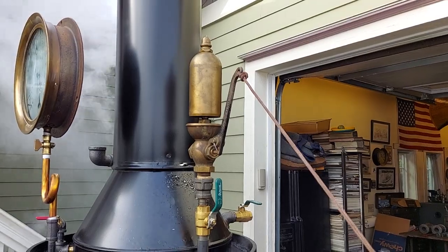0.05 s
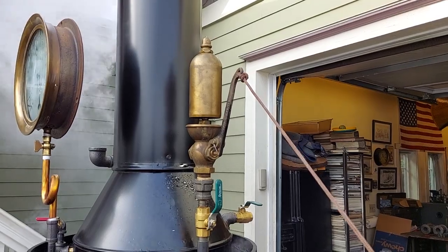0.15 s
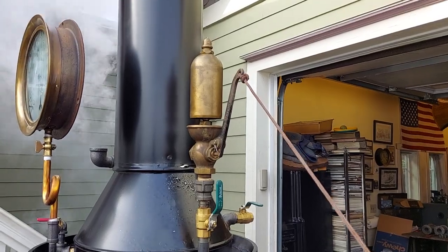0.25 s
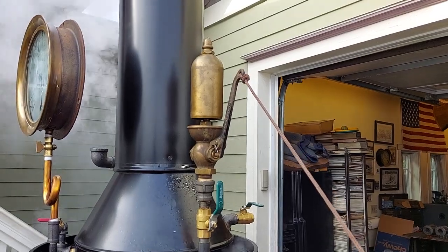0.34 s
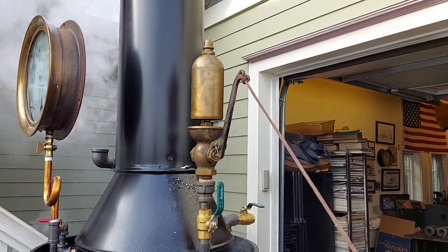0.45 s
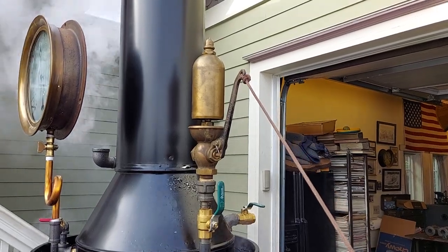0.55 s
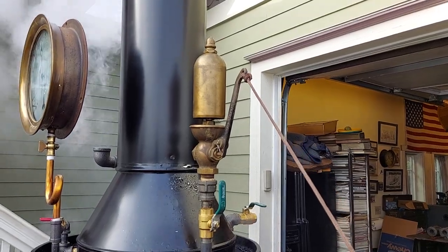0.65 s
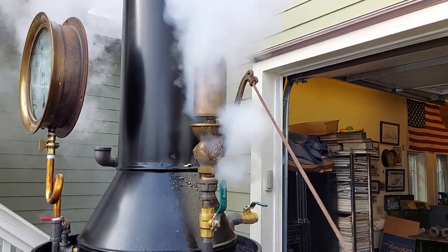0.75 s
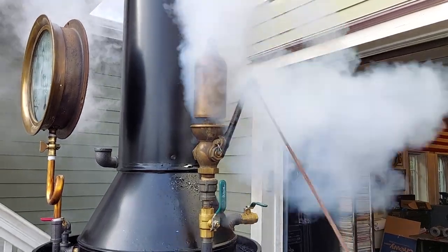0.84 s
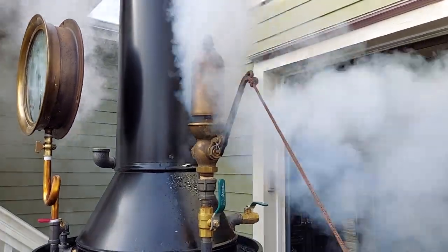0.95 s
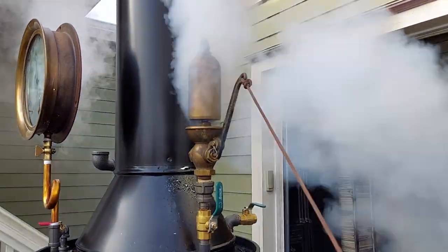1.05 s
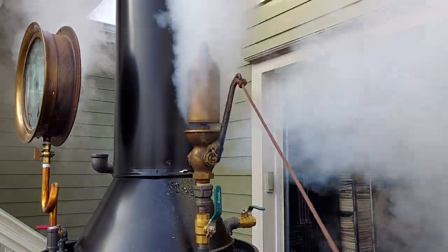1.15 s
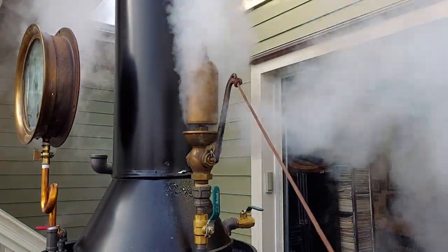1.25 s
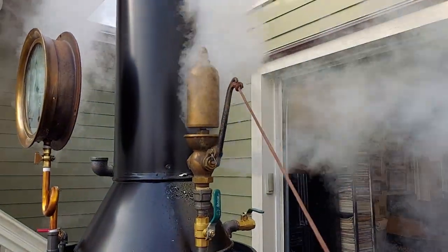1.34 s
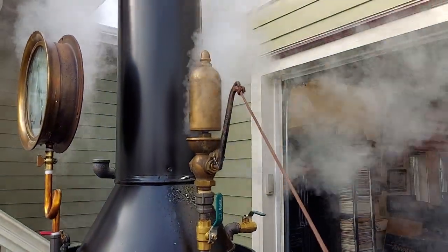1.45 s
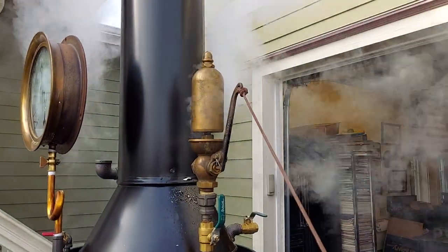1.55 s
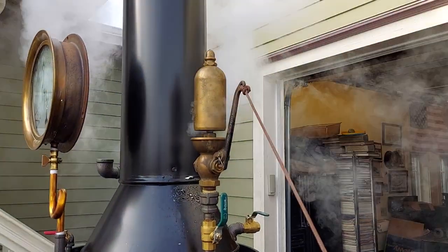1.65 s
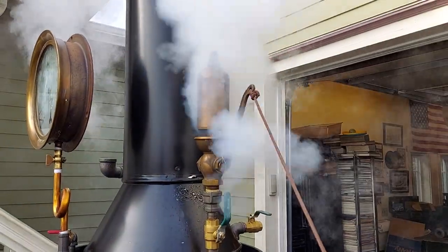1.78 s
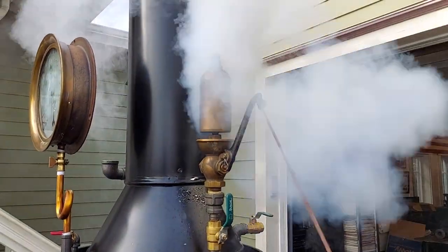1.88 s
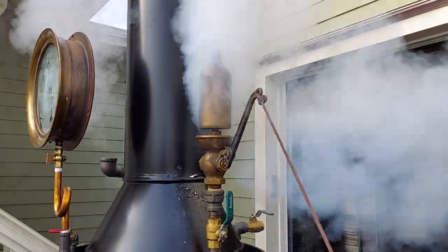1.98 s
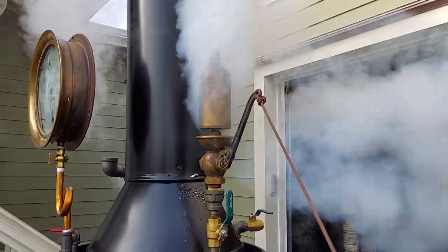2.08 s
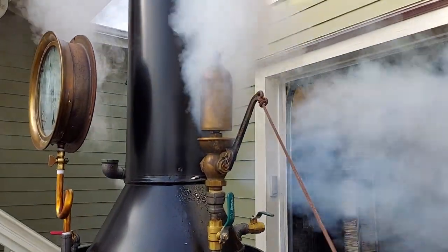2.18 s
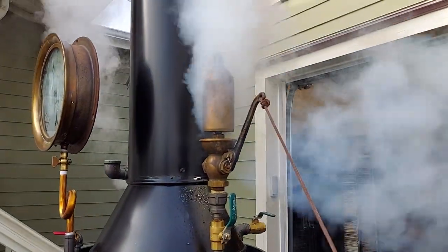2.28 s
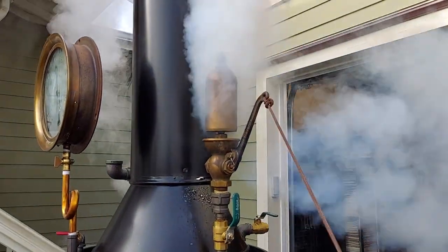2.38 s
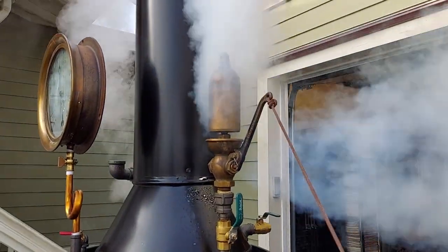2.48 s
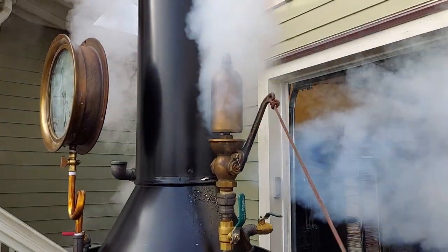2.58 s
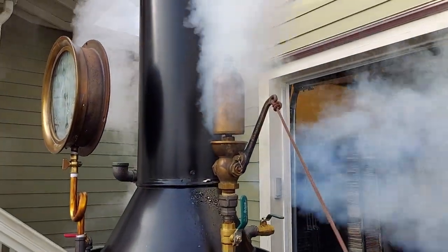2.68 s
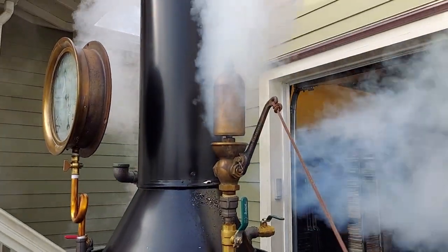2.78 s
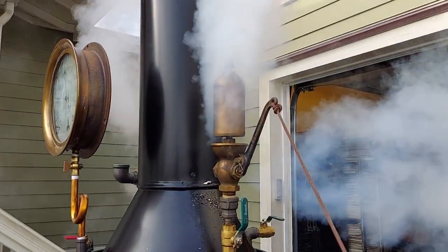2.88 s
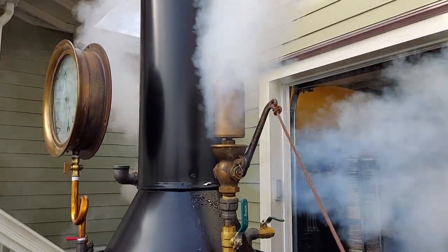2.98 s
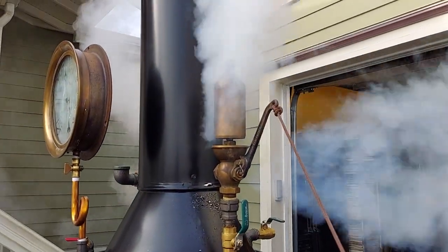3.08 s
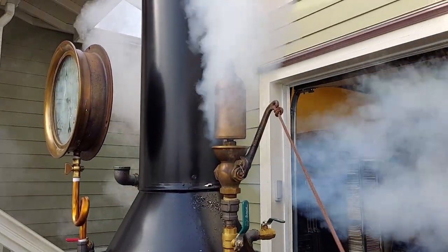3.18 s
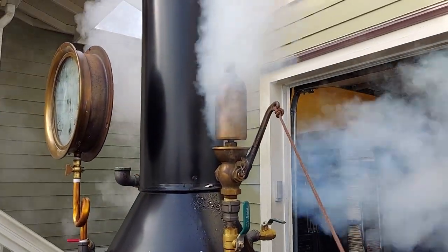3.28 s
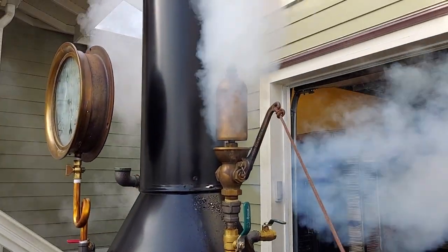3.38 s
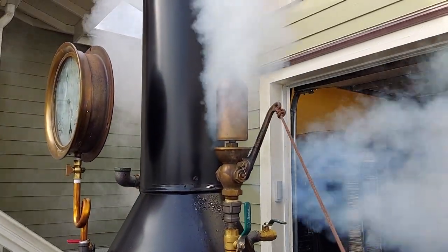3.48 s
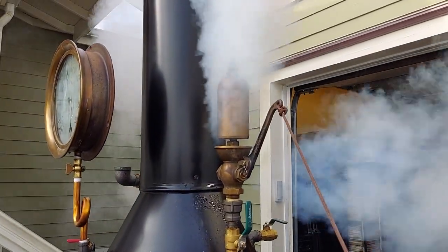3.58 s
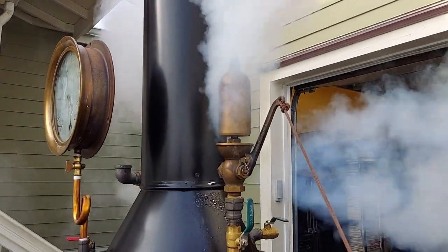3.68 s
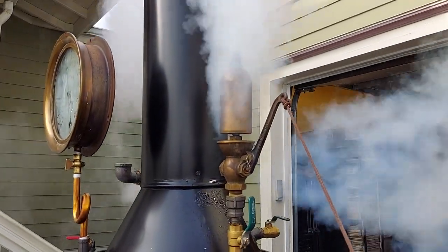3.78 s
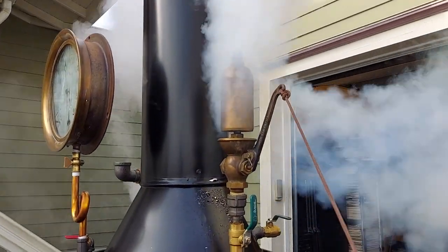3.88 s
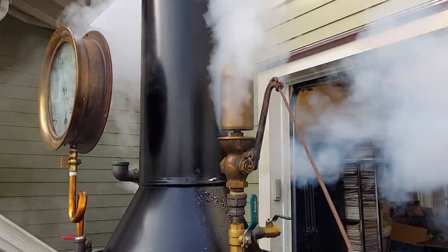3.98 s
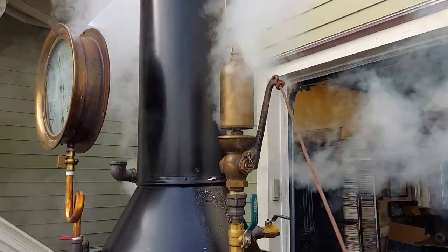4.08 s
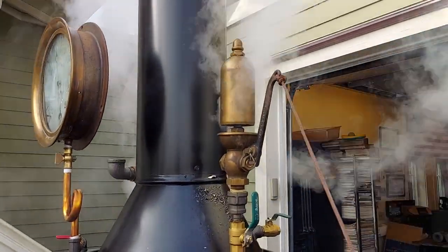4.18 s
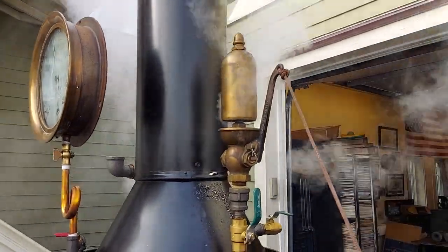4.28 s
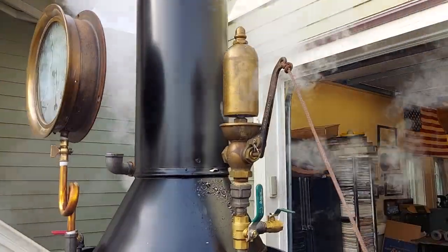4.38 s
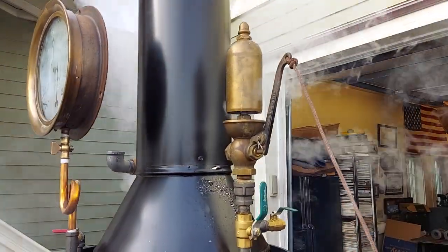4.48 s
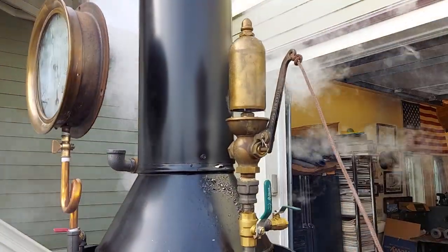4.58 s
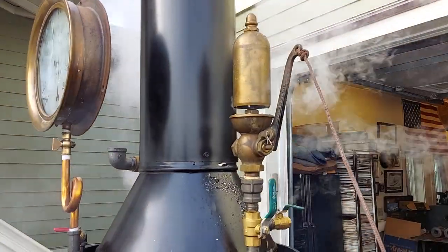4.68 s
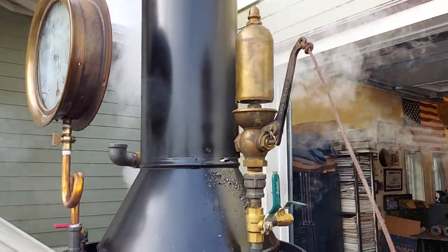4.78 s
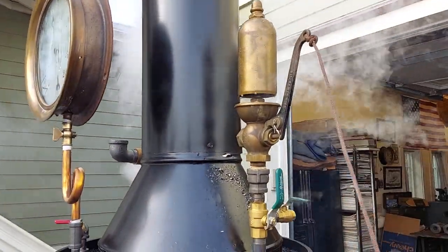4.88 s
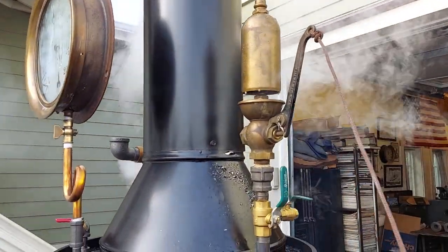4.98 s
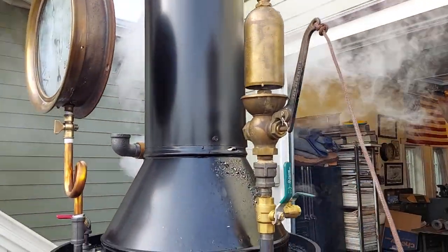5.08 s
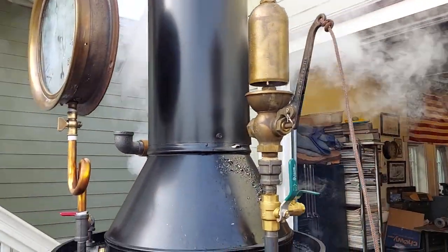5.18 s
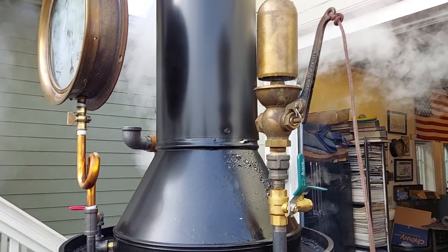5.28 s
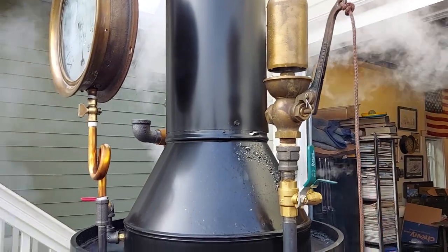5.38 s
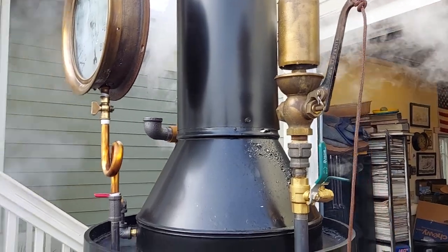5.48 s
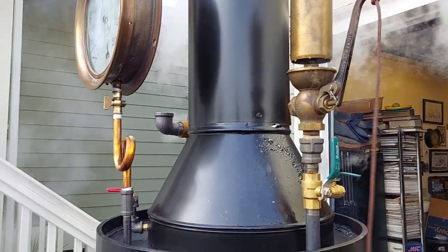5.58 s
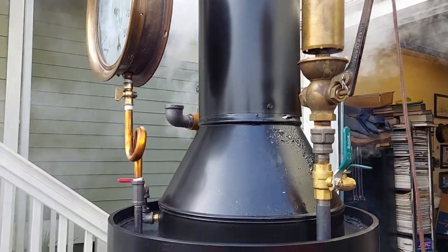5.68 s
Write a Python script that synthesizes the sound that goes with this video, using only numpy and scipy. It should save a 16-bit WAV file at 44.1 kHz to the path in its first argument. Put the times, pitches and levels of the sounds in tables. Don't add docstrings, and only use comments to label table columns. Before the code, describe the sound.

Steady steam hiss beside a boiler, then a brass steam whistle blows one short and one long shrill blast, echoing briefly outdoors.

```python
import sys
import numpy as np
from scipy import signal
from scipy.fft import rfft, irfft
from scipy.io import wavfile
from scipy.ndimage import uniform_filter1d

SR = 44100
rng = np.random.default_rng(int(sys.argv[2]) if len(sys.argv) > 2 else 0)


def natural_amplitude(level_db):
    exponent = np.asarray(level_db, float) / 20
    return 10 ** exponent


def inscribe(sig):
    pcm = np.round(np.clip(np.atleast_2d(sig).T, -1, 1) * 32767)
    wavfile.write(sys.argv[1], SR, pcm.astype(np.int16))


N = 253134
T = np.arange(N) / SR
FRAMES, BINS = np.arange(N // 128 + 5) * 128 / SR, np.fft.rfftfreq(512, 1 / SR)

# open_s, shut_s, pitch_hz, rise_s, closing_stretch (ratio)
BLASTS = [
    (0.755, 1.239, 755.2, 0.024, 0.86),
    (1.789, 4.009, 760.9, 0.028, 0.96),
]
# time_s, note_db, third_partial_db (overblowing), steam_flow_db
HOLDS = [
    [(.784, -8, -43, -30), (.8, -13, -30.5, -30), (.892, -10, -24.5, -30), (1.176, -14, -24, -33),
     (1.238, -11, -33.5, -34.5)],
    [(1.81, -9.5, -18, -22.5), (1.84, -13.5, -31, -33.5), (1.91, -17.5, -22, -31.5),
     (2.14, -19, -23, -30.5), (2.45, -15.5, -19, -29.5), (2.72, -14.5, -20, -30), (3.25, -15, -22.5, -31.5),
     (3.55, -15.5, -28, -30.5), (4.005, -13.5, -27, -30)],
]
# time_s, half_length_s, pitch_hz, note_db, third_partial_db
SURGES = [(2.569, 0.023, -4, 3, -9), (2.697, 0.048, -2.5, 2, -6.5), (2.826, 0.043, -2.5, -3, 0),
          (2.87, 0.015, 6, 0, -4), (3.037, .04, -0.44, -2.5, 1.5), (3.127, 0.046, 5.2, 2.5, -3),
          (3.612, 0.059, 3, 2.5, 6), (3.736, 0.026, -3.5, -1.5, 0), (3.785, 0.028, 8, -0.3, 3),
          (3.896, 0.03, 3.2, 1.2, 9.5), (3.933, 0.013, 1.5, 0, -8)]
# after_shut_s, pitch_sag_hz, note_db, third_partial_db
CLOSING = [(0, 0, 1, 1), (.02, -43, -8, -3.5), (.045, -35.5, -6, -22), (.065, -57, -21.5, -30),
           (.08, -68, -25, -30)]
# multiple (ratio), level_db, pan_db, phase_lead_rad
UPPER_PARTIALS = [(4, -5, 17, -2.5), (5, -1, 11.5, -3.5), (6, -8, 31, 1.5), (7, -42, -8, 1)]
# time_s, first_pan_db, first_lead_rad, second_pan_db, third_lead_rad
BEARING = [(.76, 2.1, .74, 2, 1), (.9, -4.5, -.14, 6, 1), (1.3, -6, -0.51, -1.1, 0),
           (1.8, -3, 0.093, .2, 1), (2.01, -6, 0.81, 12, -1.1), (2.6, -5, 0.91, 12, -1.8),
           (2.8, -3.5, 0.99, 0.5, -2.1), (4.0, -1, 0.55, 6, -2)]
# pitch_hz, level_db (per Hz)
JET_SPECTRUM = [(530, -23), (900, -10), (1410, -10.5), (1530, -10.5), (1920, -11.5), (2120, -7.5),
                (2220, -7.5), (2330, -14.5), (2540, -13.5), (5220, -15.5), (6410, -20), (9200, -19.5),
                (10500, -21.5), (14200, -23), (16000, -28)]
# pitch_hz, likeness (0-1)
JET_SAME = [(900, 0.79), (2000, 0.34), (4000, 0.41), (8000, 0.35), (12000, 0.3), (16000, 0.089)]
# pitch_hz, pan_db
JET_PAN = [(60, 15), (130, 11), (290, 14), (640, 33), (1410, 3), (3100, 7), (6820, 2.5), (15000, -8)]
# pitch_hz, level_db (per Hz)
BUFFET_SPECTRUM = [(20, -14), (45, 0), (90, 2), (160, -1.5), (370, -2), (640, -2.5), (1200, -11),
                   (3000, -22.5), (6000, -26)]
# peak_s, hiss_db, gasp_db (breath), jet_dies_s
SPITS = [
    (0.766, -18, -8, 1.2344),
    (1.802, -34.5, -3, 3.992),
]
# start_s, end_s, level_db, pitch_hz, width_hz
CHUFFS = [
    (0.757, 0.776, -22.5, 4480, 1200),
    (1.793, 1.816, -38, 4993, 1200),
]
# start_s, end_s, level_db, pitch_hz, width_hz
LAST_GUST = (3.96, 4.055, -36, 75, 80)
# pitch_hz, width_hz, level_db
LEAK_PIPES = [(810, 260, -10), (2123, 65, -1), (2430, 57, 0), (3160, 19, -7), (3560, 17, -4),
              (3690, 73, -3), (5790, 72, -11), (7540, 450, -11), (11500, 74, -19), (13500, 420, -15)]
# time_s, level_db, turned (0-1)
LEAK_COURSE = [(0, -21.5, 0.46), (.25, -23, 0.37), (.5, -22.5, 0.33), (.75, -23.5, 0.45),
               (1.4, -24.5, 0.63), (1.7, -18, 0.56), (4.2, -25, 0.9), (5.2, -22.5, 1), (5.74, -20.5, 1)]
# pitch_hz, likeness (0-1)
LEAK_SAME = [(60, 0.21), (170, 1), (400, 0.89), (700, 1), (1100, 0.39), (2200, 0.99), (3000, 0.33),
             (6000, 0.087), (12000, 0.19)]
# pitch_hz, pan_db
LEAK_PAN = [(60, 29.5), (130, -2), (290, 5), (640, 1), (1410, 5.5), (3100, 7), (6820, -1), (15000, -6)]
# pitch_hz, level_db
LEAK_NEAR = [(15, -60), (25, -23), (64, -12), (293, -31), (516, -0.5), (624, -28), (818, -8), (1400, -13),
             (2160, 2.5), (2910, -6), (3720, -5.5), (4370, -13), (7510, -10.5), (10700, -19.5),
             (16000, -20)]
# pitch_hz, level_db
LEAK_TURNED = [(25, -24), (70, -17), (240, -27), (430, -28.5), (620, -27), (950, -24), (1480, -27),
               (2050, -18), (2840, -23.5), (3720, -18.5), (4370, -20.5), (7510, -20.5), (10400, -24),
               (16000, -28.5)]
# peak_s, peak_db, pitch_hz, t60_s, pan_db
TICKS = [
    (5.526, -28, 5500, 0.018, 2),
    (5.5295, -18, 5350, 0.016, 2),
    (5.534, -28, 5450, 0.04, 2),
]
# left_delay_s, right_delay_s, level_db
CLOSE_SURFACES = [(.0011, 0.00093, -21.5), (.0027, 0.0021, -20.5), (.0046, 0.0041, -13),
                  (.0083, 0.0068, -12), (.0131, 0.01, -17.5), (0.0202, 0.018, -11)]
# delay_s, level_db, pan_db
WALLS = [(.07, -25.5, 4.5), (.131, -18.5, 4), (.186, -34, 7.5), (.283, -39, 4)]
# delay_s, level_db
FAR_HOUSES = [(.45, -88), (.62, -66.5), (.78, -52), (.87, -41)]
# multiple (ratio), level_db, width_hz
DRONE_PARTIALS = [(1, -43.5, 4.8), (2, -24.5, 0.65), (4, -39.5, 8.63), (5, -49.5, 7.8)]
# time_s, level_db
DRONE_SWELL = [(0, -66), (2.6, -22), (3.6, -4), (5.74, 3)]
# time_s, gain_db
GAIN = [(0, 0), (.768, 1), (.79, -19), (.9, -18), (1.8, -26.5), (2.1, -22.5), (5.08, -22), (5.74, -13)]
# pitch_hz, level_db
MIC = [(20, -40), (50, 0), (5500, 0), (6400, -6), (7300, -2.5), (9900, 0.5), (10400, -8), (11400, -4.5),
       (13000, -3.5), (14200, 2.5), (15700, 4.5)]

SCOOP_HZ, SCOOP_S, RISE_DB = 63, .025, 39
DRY_S, DRYING_S, DRY_SAG_HZ = 2.67, .09, 12
WARMING_S = 1.3
SECOND_DB, SECOND_WARM_DB, SECOND_DRY_DB, SECOND_DB_PER_HZ = -39, 10, -7, 1.15
THIRD_PAN_DB, THIRD_PAN_DRY_DB = 4, 2
UPPER_DB, UPPER_WARM_DB, WEAK_RISE_S = -49.5, 17, 0.012
SPIT_DB_PER_S, GASP_LATE_S, GASP_DB_PER_S, GASP_RISE_S = 1498, 0.008, 300, 0.0048
JET_RISE_S, JET_FALL_DB_PER_S = 0.041, 694
LINGER_DB, LINGER_FALL = -16.5, 0.13
HISS_DRY_DB, BUFFET_DB, BUFFET_DRY_DB, BUFFET_FALL = -2, 4.5, -5, 1.2
BREATH_DB, BREATH_DRY_DB, DAMP_AGAIN_S = 16, -45, 3.72
DRONE_HZ = 244.95


def whistle():
    out, thrown = np.zeros((2, N)), np.zeros(N)
    shake_hz, tremble_db, tremble3_db = 1.2 * wander(60), .5 * wander(90), 1.1 * wander(90)
    pan_db, lead, pan2_db, lead3 = curves(BEARING, T)
    dry, lift_hz = dryness(), surge(column=2)
    blown_s = sum((shut - opens) * ramp(opens, shut - opens) for opens, shut, *_ in BLASTS)
    warm = np.minimum(blown_s / WARMING_S, 1)
    for (opens, shut, top_hz, rise, stretch), rows in zip(BLASTS, HOLDS):
        sag_hz, close_db, close3_db = curves(CLOSING, (T - shut) / stretch)
        scoop_hz = SCOOP_HZ * np.exp(-np.maximum(T - opens, 0) / SCOOP_S)
        hz = top_hz - DRY_SAG_HZ * dry + lift_hz + sag_hz - scoop_hz
        phase = 2 * np.pi * np.cumsum(hz + shake_hz) / SR
        carry = natural_amplitude(-.7 * np.maximum(746 - hz, 0))
        on = ramp(opens, 0.0072) - ramp(shut + stretch * CLOSING[-1][0] - .006, .006)
        weak = ramp(opens + rise, WEAK_RISE_S) - ramp(shut, WEAK_RISE_S)

        first_db, third_db, _ = curves(rows, T) - RISE_DB * (1 - ramp(opens, rise)) ** 2
        first_db = first_db + surge(column=3) + close_db + tremble_db
        third_db = third_db + surge(column=4) + close3_db + tremble3_db
        second_db = SECOND_DB + SECOND_WARM_DB * warm
        second_db = second_db + dry * (SECOND_DRY_DB + SECOND_DB_PER_HZ * lift_hz)
        first = natural_amplitude(first_db) * ports(phase, pan_db, lead)
        second = weak * carry * natural_amplitude(second_db + wander(80)) * ports(2 * phase, pan2_db, 1.0)
        third = natural_amplitude(third_db) * ports(3 * phase, THIRD_PAN_DB + THIRD_PAN_DRY_DB * dry, lead3)
        out += on * (first + second + third)
        thrown += on * carry * (first + natural_amplitude(-11.0) * second + natural_amplitude(1.5) * third).mean(0)

        for multiple, db, upper_pan_db, upper_lead in UPPER_PARTIALS:
            upper_db = UPPER_DB + UPPER_WARM_DB * warm + db + wander(85.1)
            upper = weak * natural_amplitude(upper_db) * ports(multiple * phase, upper_pan_db, upper_lead)
            out += upper
            thrown += natural_amplitude(-6) * carry * upper.mean(0)
    return out, thrown


def dryness():
    return ramp(DRY_S - DRYING_S / 2, DRYING_S)


def surge(column):
    return sum(row[column] * np.exp(-((T - row[0]) / row[1]) ** 2) for row in SURGES)


def jet():
    hissing, buffeting, breathing = flows()
    sheet = hiss(read(JET_SPECTRUM, BINS)[:, None], JET_SAME, JET_PAN, 0.00021,
                 patchy_db=1.0, flicker_db=0.95)
    buffet = hiss(read(BUFFET_SPECTRUM, BINS)[:, None], [(20, .1), (900, 0.15)],
                  [(20, 15), (300, 17.8), (900, 24.0)], 1e-4, patchy_db=0.5, flicker_db=1.0)
    breath = breathing * natural_amplitude(-13) * evened(resonate(sheet, 2210, 286))
    breath += breathing * natural_amplitude(-16.5) * evened(resonate(sheet + buffet, 731, 155))
    breath += sum(puff(sheet, *row) for row in CHUFFS)
    steam = hissing * natural_amplitude(3.0) * sheet + breath
    return steam, buffeting * natural_amplitude(2.5) * buffet + puff(buffet, *LAST_GUST)


def flows():
    dry = dryness()
    hissing, buffeting, breathing = strengths = np.zeros((3, N))
    clear = dry - 0.92 * ramp(DAMP_AGAIN_S, 0.12)
    for (opens, *_), rows, (spit_s, spit_db, gasp_db, dies) in zip(BLASTS, HOLDS, SPITS):
        flow = ramp(opens, JET_RISE_S) ** 2 * natural_amplitude(curves(rows, T)[2])
        fall_db = JET_FALL_DB_PER_S * np.maximum(T - dies, 0)
        lasting = natural_amplitude(-fall_db) + natural_amplitude(LINGER_DB - LINGER_FALL * fall_db)
        hissing += flow * natural_amplitude(HISS_DRY_DB * dry) * lasting
        hissing += natural_amplitude(spit_db - SPIT_DB_PER_S * abs(T - spit_s))
        buffeting += flow * natural_amplitude(BUFFET_DB + BUFFET_DRY_DB * dry - BUFFET_FALL * fall_db)
        breathing += flow * natural_amplitude(BREATH_DB + BREATH_DRY_DB * clear - fall_db)
        gasp = natural_amplitude(gasp_db - GASP_DB_PER_S * abs(T - spit_s - GASP_LATE_S))
        breathing += ramp(spit_s, GASP_RISE_S) ** 2 * gasp
    return strengths


def puff(x, start, end, db, hz, width):
    swell = np.sin(np.pi * np.clip((T - start) / (end - start), 0, 1))
    return natural_amplitude(db) * swell * evened(resonate(x, hz, width))


def leak():
    level_db, _ = curves(LEAK_COURSE, T)
    turned = np.clip(curves(LEAK_COURSE, FRAMES)[1], 0, 1)
    humps_db = sum(5.54 / (1 + (2 * (BINS - hz) / (width + 150)) ** 2) for hz, width, _ in LEAK_PIPES)
    field_db = np.outer(read(LEAK_NEAR, BINS), 1 - turned) + np.outer(read(LEAK_TURNED, BINS), turned)
    field_db += humps_db[:, None]
    field_db -= 10 * np.log10(np.mean(natural_amplitude(2 * field_db), axis=0))
    return natural_amplitude(level_db) * hiss(field_db, LEAK_SAME, LEAK_PAN, 1.1e-4, patchy_db=.4, flicker_db=.4)


def tick():
    out = np.zeros((2, N))
    for s, db, hz, t60, pan_db in TICKS:
        u = np.maximum(T - s, 0)
        envelope = natural_amplitude(db - 60 * u / t60) * np.minimum(u / .001, 1)
        out += envelope * ports(2 * np.pi * hz * u, pan_db, 1.6) / np.sqrt(2)
    return out


def close(x):
    taps = np.zeros((2, 1200))
    taps[:, 0] = 1
    for left_s, right_s, db in CLOSE_SURFACES:
        taps[[0, 1], [round(left_s * SR), round(right_s * SR)]] += natural_amplitude(db)
    return signal.oaconvolve(x, taps / np.linalg.norm(taps[0]), axes=1)[:, :N]


def yard(x):
    taps = np.zeros((2, SR))
    at = np.arange(400, SR - 20, 20) + rng.integers(0, 20, (2, (SR - 401) // 20))
    np.put_along_axis(taps, at, rng.choice([-1., 1.], at.shape), 1)
    taps *= natural_amplitude(-46 - 60 * T[:SR] / .5)
    for s, db, pan_db in WALLS:
        taps[:, round(s * SR)] += natural_amplitude(np.array([db + pan_db, db - pan_db]))
    for s, db in FAR_HOUSES:
        taps[:, round(s * SR)] += natural_amplitude(db)
    return signal.fftconvolve(x[None], taps, axes=1)[:, :N]


def drone():
    tones = np.zeros((2, N))
    for multiple, db, width in DRONE_PARTIALS:
        strength = natural_amplitude(db + 0.25 * width * wander(30))
        turns = np.cumsum(DRONE_HZ + 0.58 * width * wander(17.2)) / SR
        tones += strength * ports(multiple * 2 * np.pi * turns, 2.2, -0.21)
    return natural_amplitude(curves(DRONE_SWELL, T)[0]) * tones


def hiss(field_db, same, pan, lag_s, patchy_db, flicker_db):
    a, b, c, d, patches = rng.standard_normal((len(FRAMES), len(BINS), 5)).T
    patches = evened(uniform_filter1d(uniform_filter1d(patches, size=6, axis=0), size=16, axis=1))
    flicker = evened(uniform_filter1d(a[0], size=4))
    same = np.clip(read(same, BINS), 0, 1)[:, None]
    side = natural_amplitude(read(pan, BINS) / 2)[:, None]
    turn = np.exp(-2j * np.pi * BINS * lag_s)[:, None]
    right = a + 1j * b
    left = side * turn * (same * right + np.sqrt(1 - same ** 2) * (c + 1j * d))
    middle = np.sqrt(side ** 2 + side ** -2 + 2 * same * turn.real)
    strength = natural_amplitude(field_db + patchy_db * patches + flicker_db * flicker)
    z = np.array([left, right / side]) / middle * strength
    x = signal.istft(z, nperseg=512, noverlap=384)[1][:, :N]
    return x / np.std(x.mean(0))


def ports(phase, pan_db, lead):
    left, right = natural_amplitude(pan_db / 2) * np.exp(1j * lead), natural_amplitude(-pan_db / 2)
    wave = np.exp(1j * phase) * np.sqrt(8) / np.maximum(abs(left + right), .7)
    return np.array([(left * wave).real, (right * wave).real])


def resonate(x, hz, width):
    turn = np.exp(2j * np.pi * np.cumsum(hz * np.ones(N)) / SR)
    r = np.exp(-np.pi * width / SR)
    smooth = signal.lfilter([1], [1, -r], signal.lfilter([1], [1, -r], x / turn))
    return (turn * smooth).real


def wander(hz):
    lowpass = signal.butter(2, hz, fs=SR, output="sos")
    return evened(signal.sosfilt(lowpass, rng.standard_normal(N)))


def evened(x):
    return x / np.sqrt(np.mean(abs(x) ** 2) + 1e-20)


def ramp(start, length):
    return np.clip((T - start) / length, 0, 1)


def read(points, hz):
    f, value = np.transpose(points)
    return np.interp(np.log(hz + 1), np.log(f + 1), value)


def curves(rows, t):
    s, *columns = np.transpose(rows)
    return [np.interp(t, s, c) for c in columns]


def scene():
    steam, buffet = jet()
    note, thrown = whistle()
    undo = natural_amplitude(-curves(GAIN, T)[0])
    echoes = yard((thrown + natural_amplitude(-19.5) * steam.mean(0)) * undo)
    return (note + buffet + tick()) * undo + echoes + close(steam * undo + leak()) + drone()


def top_cut(x):
    return signal.sosfilt(signal.butter(12, 17070, fs=SR, output="sos"), x)


def record(dry):
    hz = np.fft.rfftfreq(N, 1 / SR)
    limited = np.tanh(dry * natural_amplitude(curves(GAIN, T)[0]) / 1.491) * 1.524
    colour = natural_amplitude(read(MIC, hz)) * (hz < 15750)
    mix = irfft(rfft(limited) * colour, N)
    return top_cut(mix)


dry = scene()
out = record(dry)
inscribe(out)
```